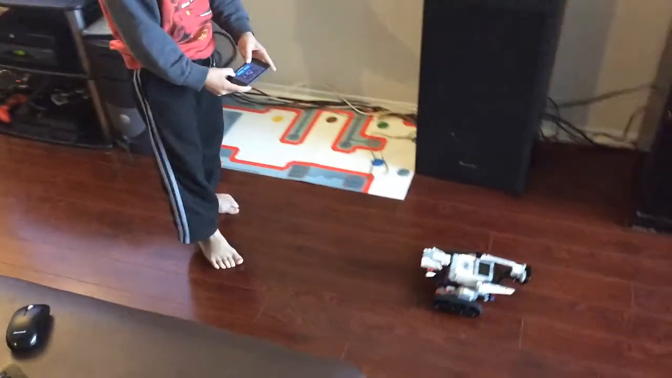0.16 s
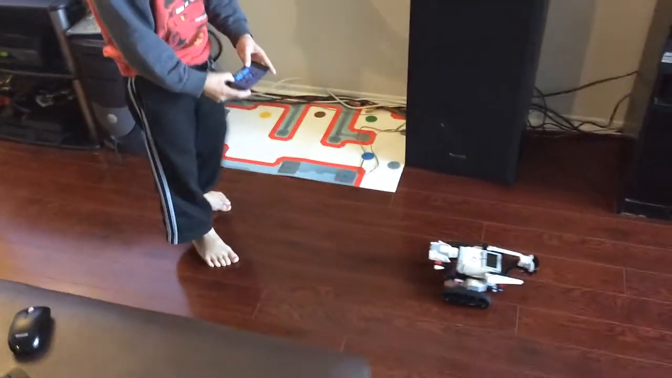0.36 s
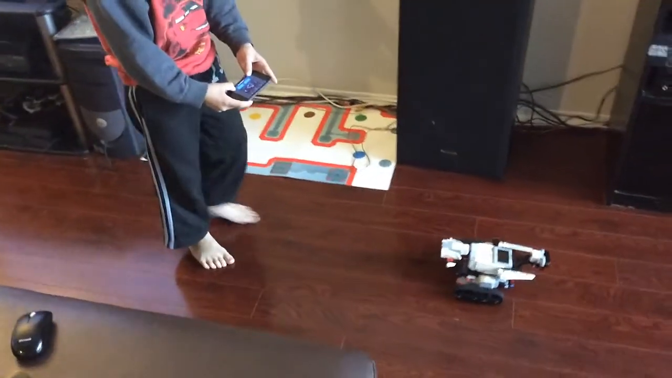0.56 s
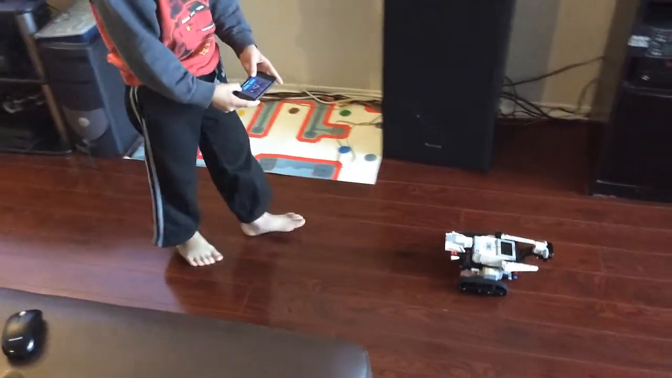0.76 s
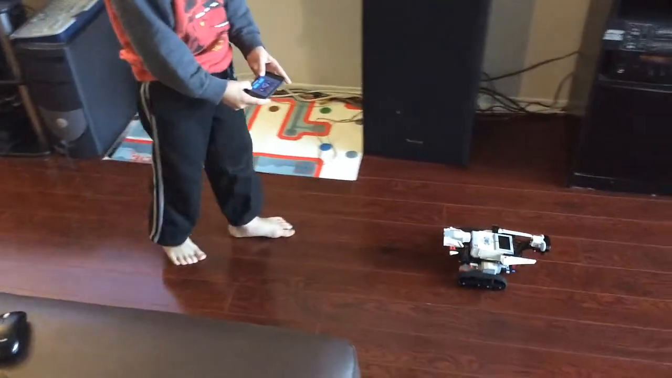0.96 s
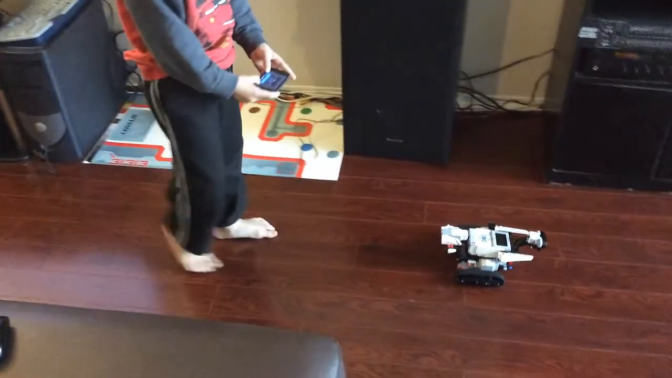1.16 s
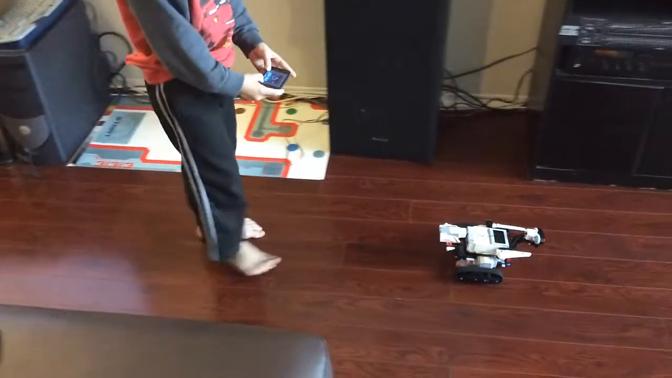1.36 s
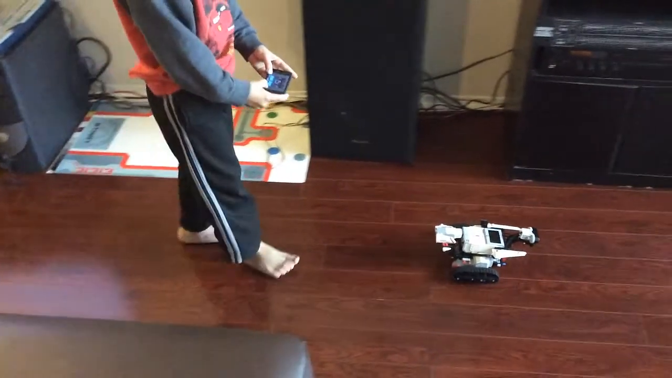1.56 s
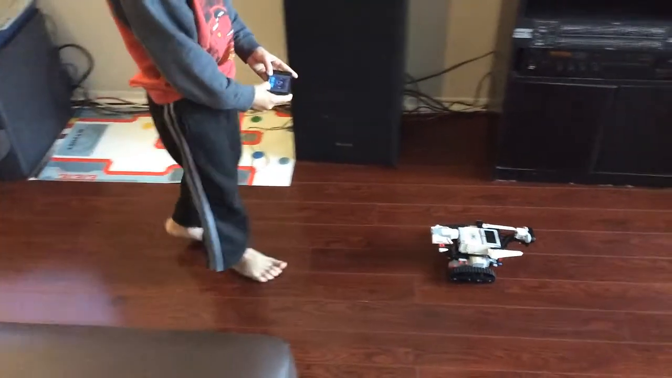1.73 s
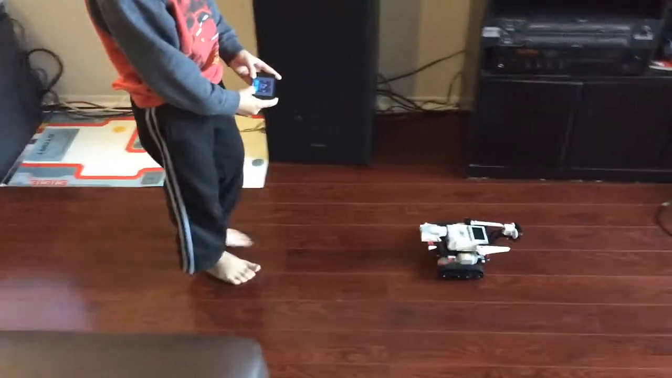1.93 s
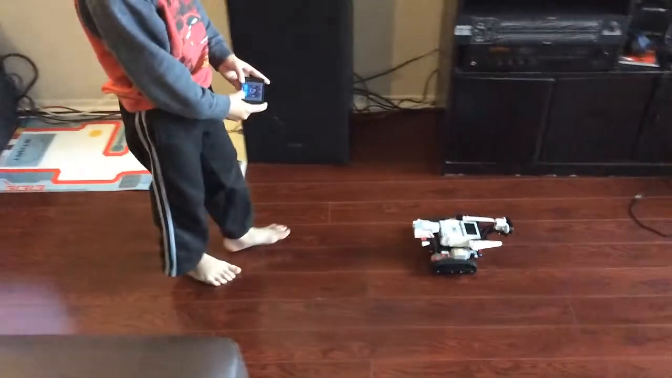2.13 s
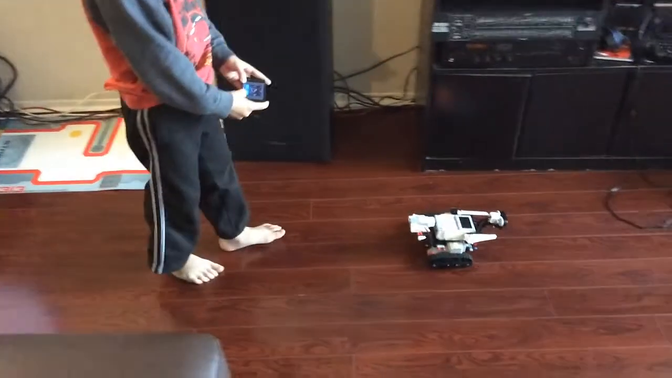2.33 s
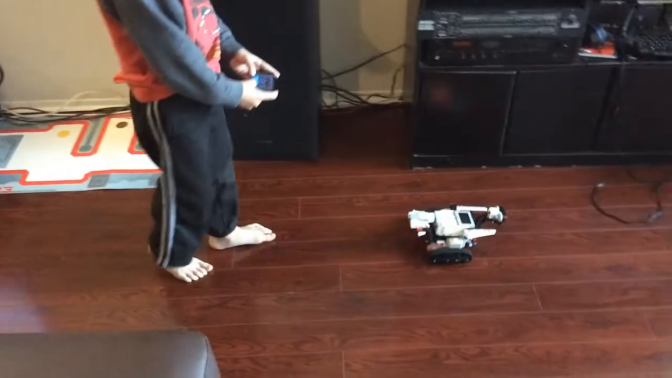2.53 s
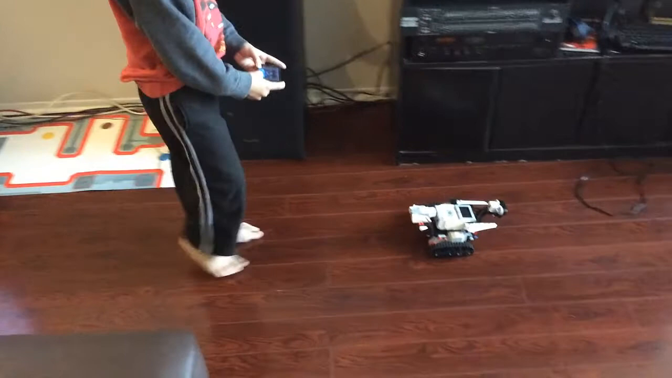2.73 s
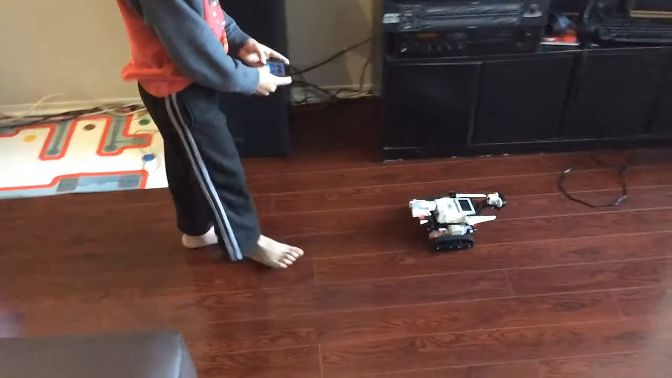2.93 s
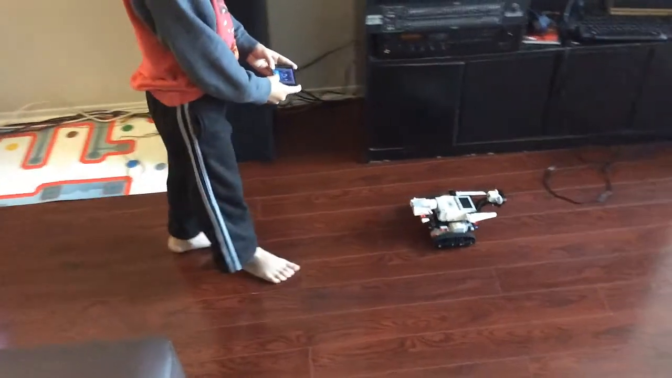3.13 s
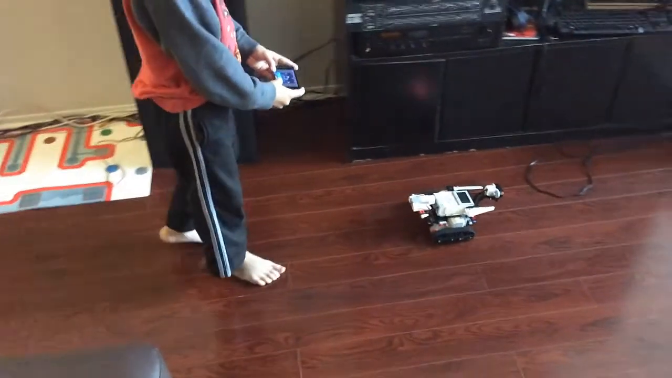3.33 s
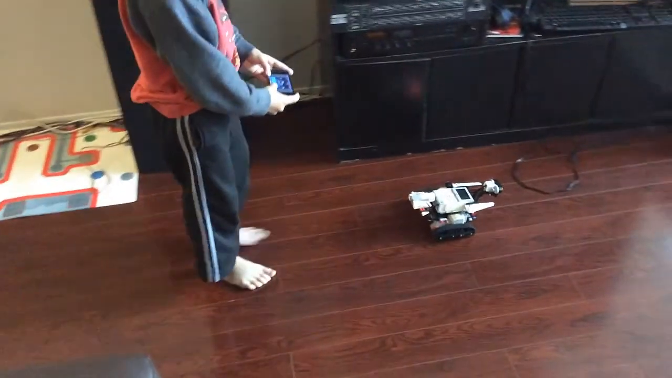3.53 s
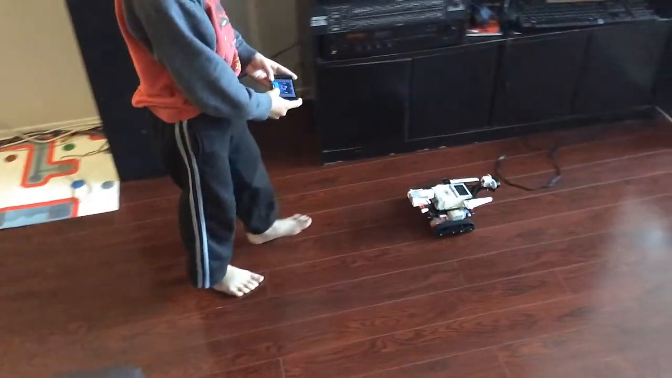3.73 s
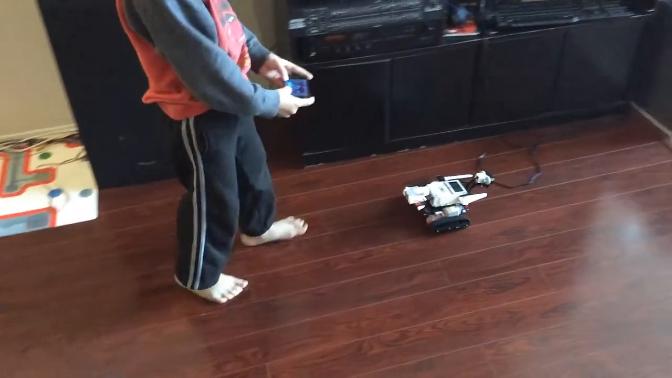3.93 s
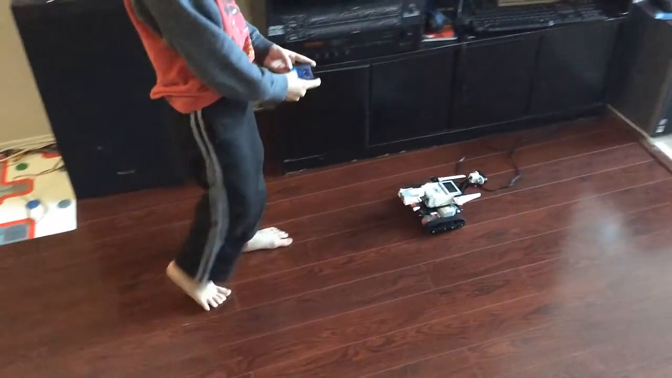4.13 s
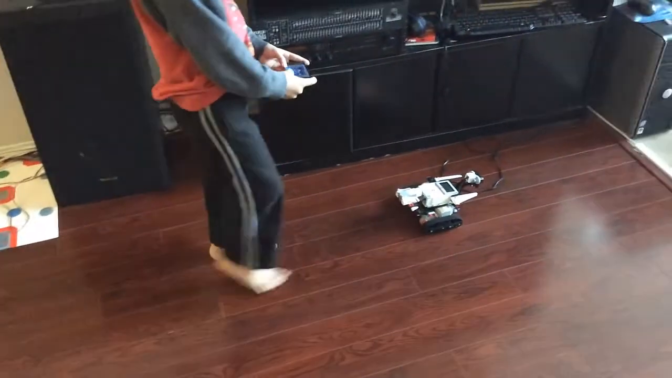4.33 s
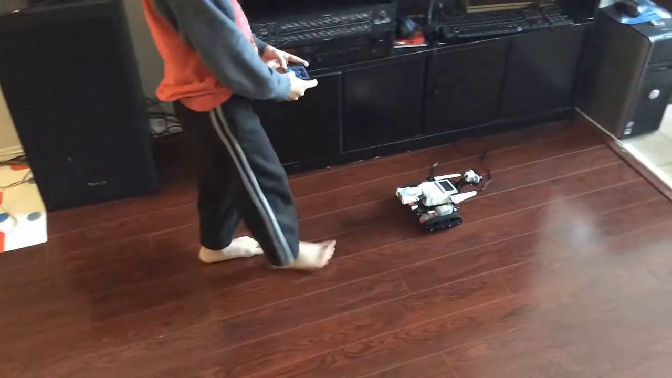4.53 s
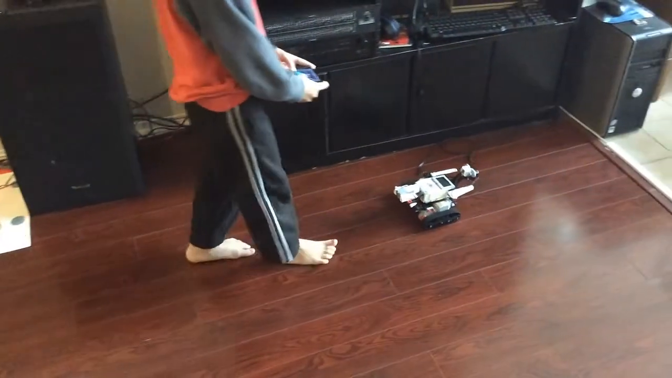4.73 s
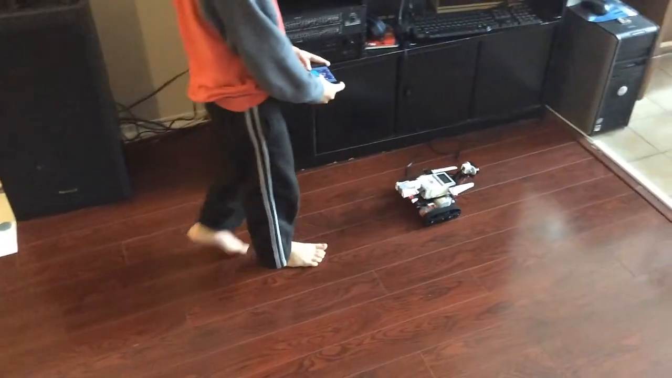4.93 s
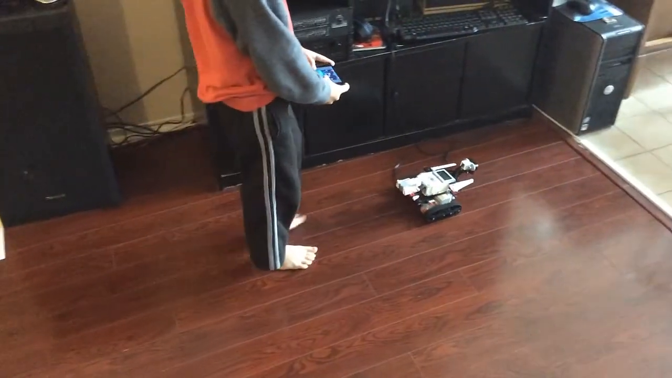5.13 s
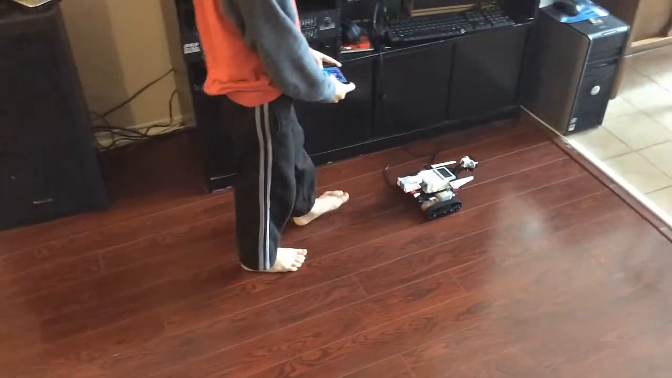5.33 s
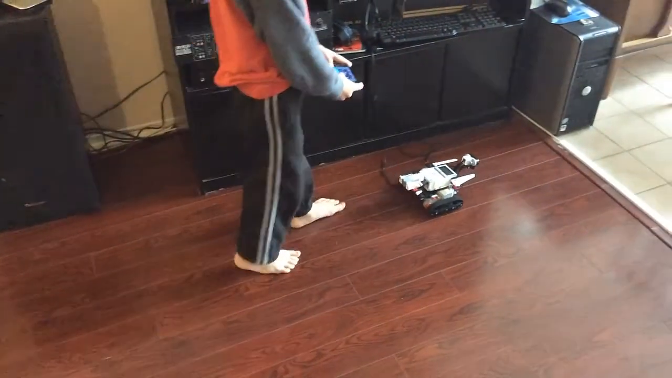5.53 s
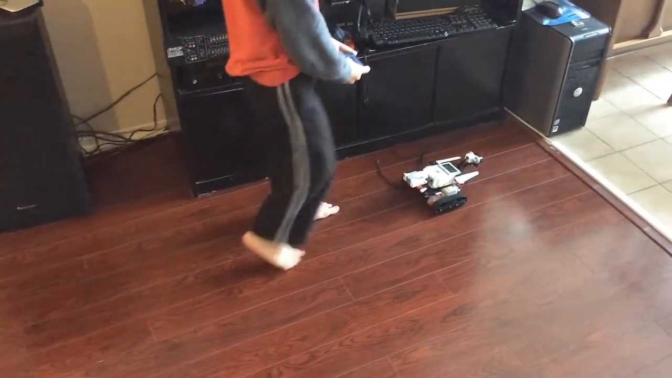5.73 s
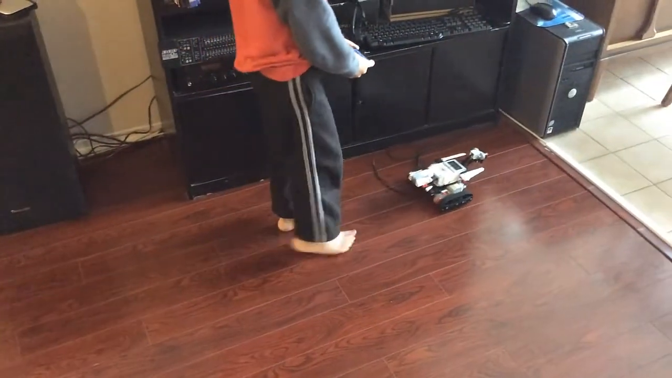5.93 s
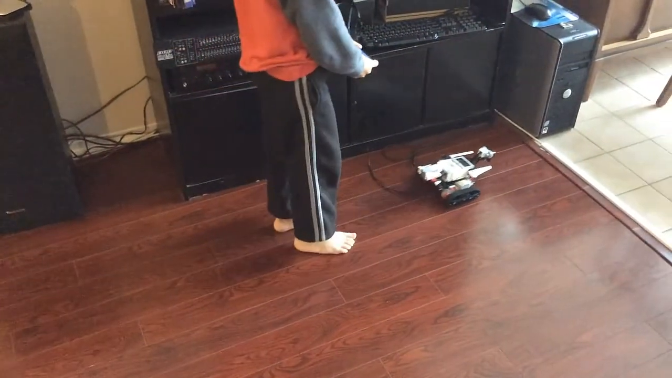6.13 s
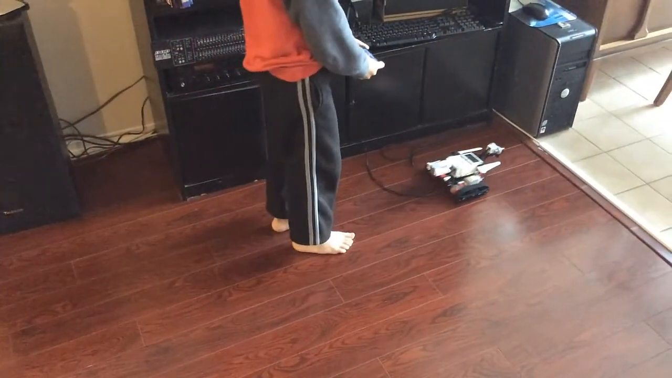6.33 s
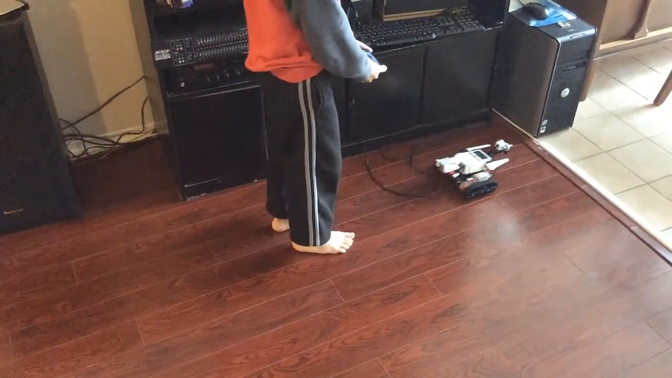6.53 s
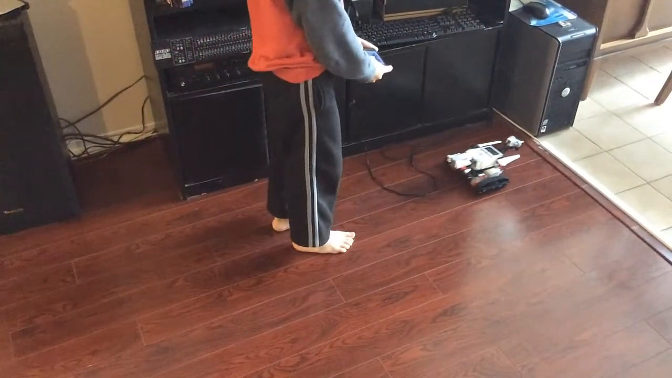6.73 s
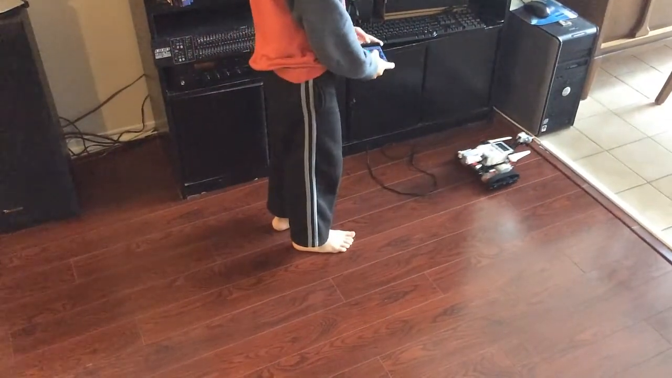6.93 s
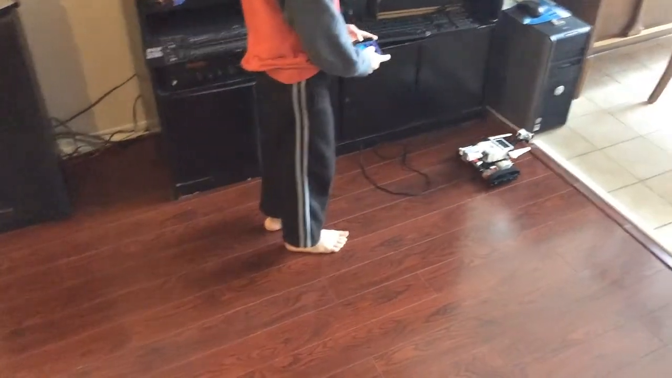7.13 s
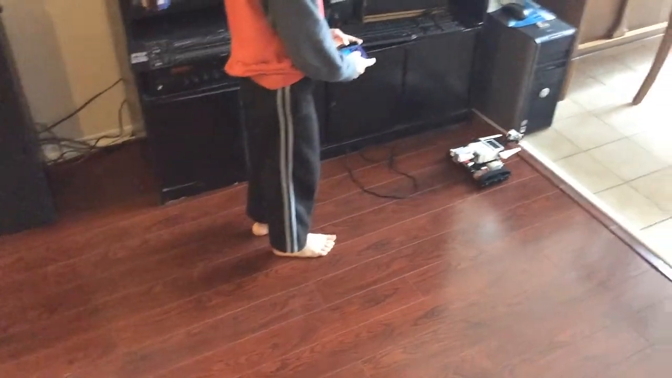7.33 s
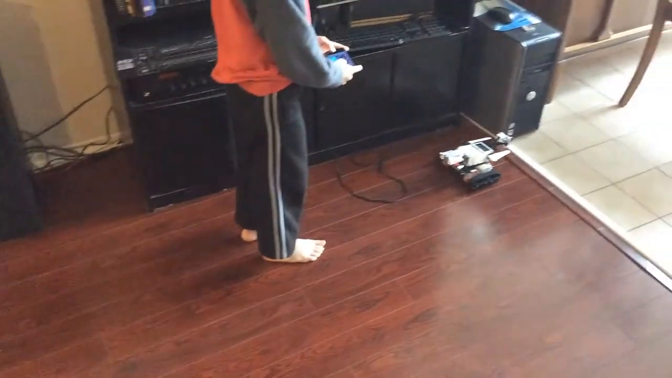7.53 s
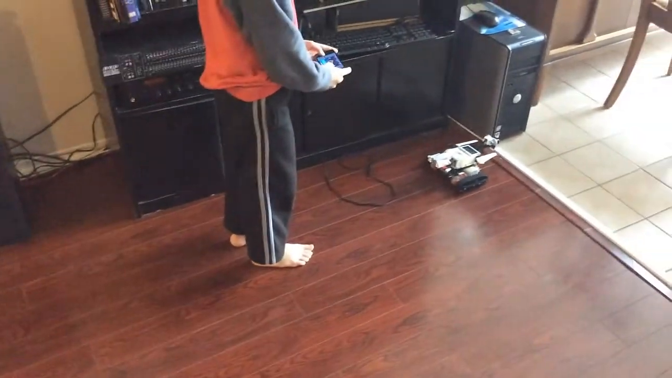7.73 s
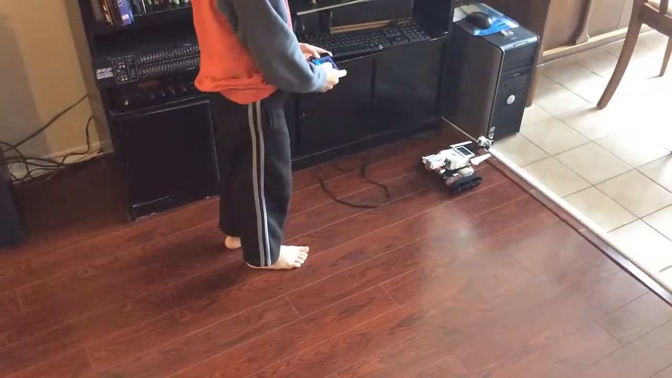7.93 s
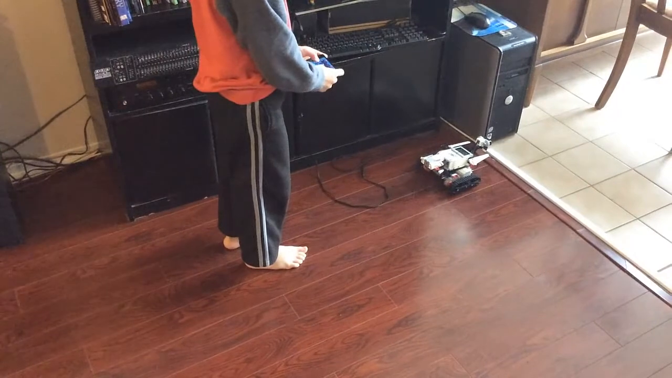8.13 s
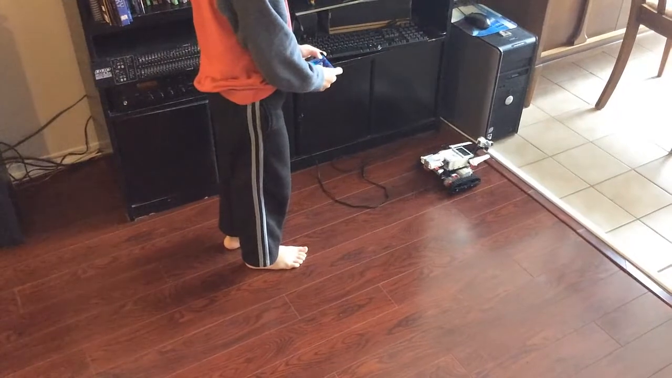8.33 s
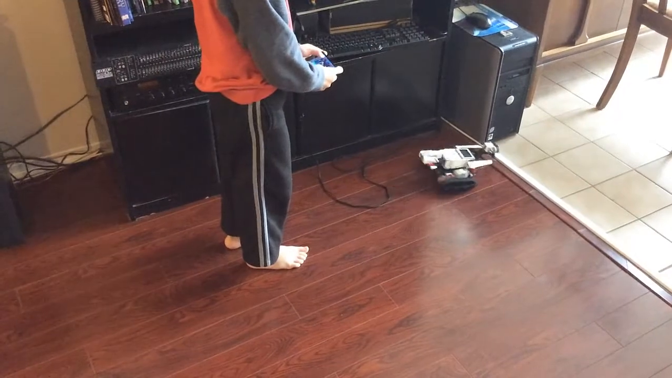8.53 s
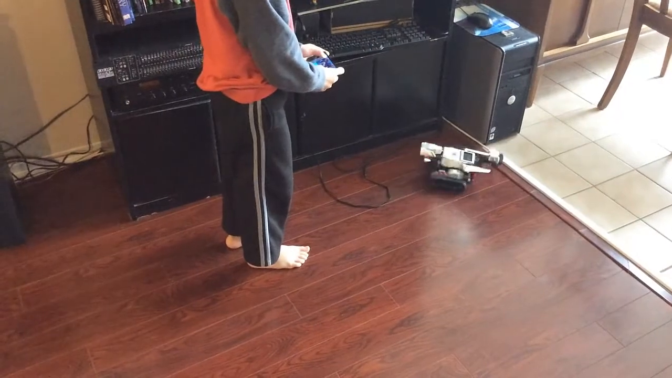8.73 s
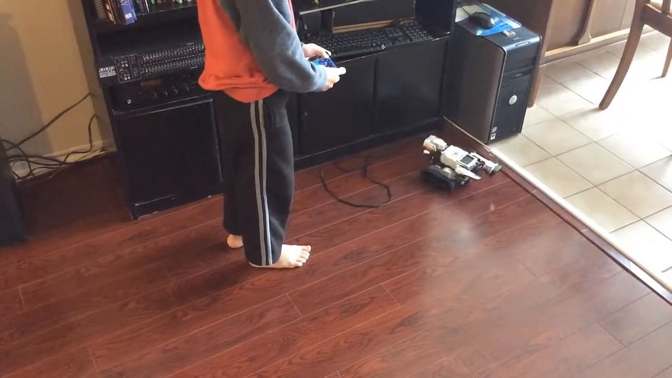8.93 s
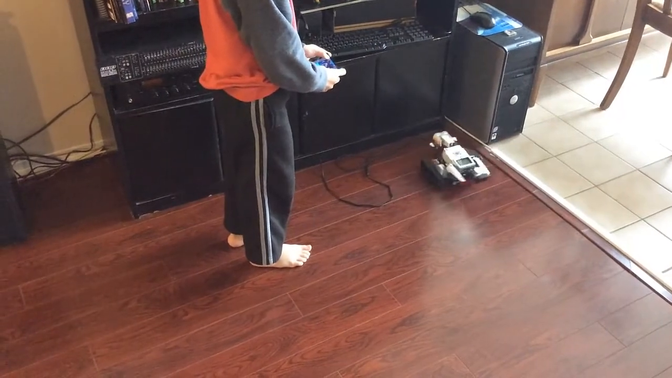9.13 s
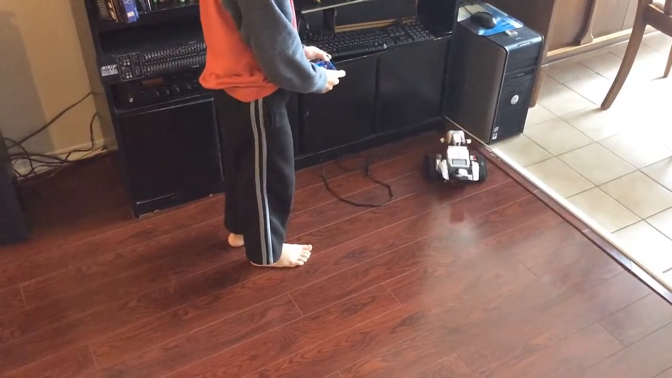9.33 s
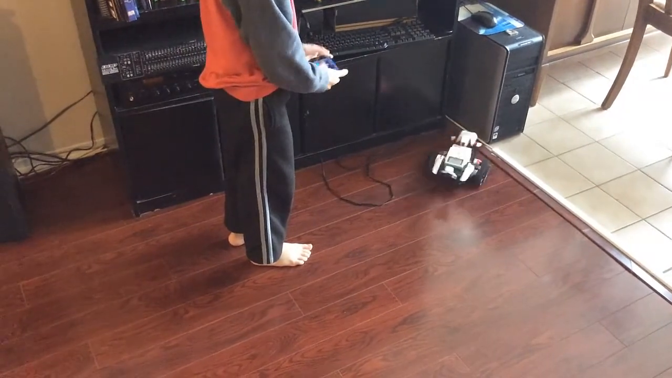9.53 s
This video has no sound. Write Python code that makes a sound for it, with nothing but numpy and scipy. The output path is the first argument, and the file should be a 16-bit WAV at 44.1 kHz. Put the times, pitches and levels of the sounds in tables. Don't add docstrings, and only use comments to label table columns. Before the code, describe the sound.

A small tracked toy robot's twin geared motors whine steadily across a hard indoor floor, coast down to a stop, then whir up again into a turn.

```python
import sys
import numpy as np
from scipy import signal
from scipy.fft import rfft, irfft, dct, next_fast_len
from scipy.io import wavfile
from scipy.ndimage import uniform_filter1d, map_coordinates

SR = 44100
rng = np.random.default_rng(int(sys.argv[2]) if len(sys.argv) > 2 else 0)


def wav_out(sig):
    wavfile.write(sys.argv[1], SR, np.round(np.clip(np.atleast_2d(sig).T, -1, 1) * 32767).astype(np.int16))


def amplitude_ratio(level_db):
    exponent = np.asarray(level_db, float) / 20
    return 10 ** exponent


N = 426447
STOP_S, START_S, TURN_S = 6.952, 8.39, 8.2
TEETH = 10
SLOW_STEP = 64


def evened(x):
    return x / np.sqrt(np.mean(abs(x) ** 2) + 1e-20)


def curves(rows):
    s, *columns = np.transpose(rows)
    return [np.interp(np.arange(N) / SR, s, c) for c in columns]


def ramp(s, length_s):
    return np.clip((np.arange(N) / SR - s) / length_s, 0, 1)


def read(points, hz):
    f, value = np.transpose(points)
    return np.interp(np.log(hz + 1), np.log(f + 1), value)


def wander(count, hz):
    shape = (count, N // SLOW_STEP + 2)
    z = rng.standard_normal(shape) + 1j * rng.standard_normal(shape)
    r = np.exp(-2 * np.pi * hz * SLOW_STEP / SR)
    return evened(signal.lfilter([1], [1, -2 * r, r * r], z))


def stretch(slow):
    return np.interp(np.arange(N) / SLOW_STEP, np.arange(len(slow)), slow)


def sway_gain(depth_db, hz):
    return amplitude_ratio(depth_db * stretch(wander(1, hz)[0].real))


def fuzzy_tone(phase, z):
    return stretch(abs(z)) * np.cos(phase + stretch(np.unwrap(np.angle(z))))


def colour(x, db_of):
    size = next_fast_len(N)
    gain = amplitude_ratio(db_of(np.fft.rfftfreq(size, 1 / SR)))
    return irfft(rfft(x, size) * gain, size)[:N]


def high_pass_db(hz, corner_hz, power):
    return -10 * np.log10(1 + (corner_hz / (hz + 1)) ** power)


def lines(rows):
    t, out = np.arange(N) / SR, 0
    for hz, width_hz, db, *steady in rows:
        share = np.clip(sum(steady), 0, 1)
        z = share + np.sqrt(1 - share ** 2) * wander(1, width_hz)[0]
        out = out + amplitude_ratio(db) * fuzzy_tone(2 * np.pi * hz * t, z)
    return out


# frequency in Hz, level in dB per Hz.
AIR_SPECTRUM = [(30, -46), (48, -13), (100, -16.5), (300, -17.5), (480, -26), (700, -32.5), (1200, -21),
                (1900, -19.5), (2700, -25.5), (4500, -24), (5500, -32), (6800, -43), (14000, -43),
                (15300, -54)]
# frequency in Hz, width in Hz, level in dB, steady share.
HUM_LINES = [(236.5, 4, -66.5, 0.9), (267, 14, -76, 0.21)]
# frequency in Hz, width in Hz, level in dB.
FAN_LINES = [(871, 48, -65), (923.4, 22.2, -52), (962, 15.7, -55.5), (1020, 74, -60.5), (1490, 60, -68.5),
             (1846, 43, -65.5), (2056, 70, -64.5), (3880, 130, -73), (4470, 100, -66), (8250, 170, -81),
             (8940, 39, -82), (12600, 74, -83), (14500, 200, -90)]
# time in seconds, gain in dB.
ROOM_GAIN = [
    (0, -2.5),
    (3, -6),
    (7.0, -4),
    (7.4, 0),
    (7.6, 1.5),
    (8.36, 1),
    (8.45, -6),
    (8.7, -8.5),
    (9.3, -10),
    (9.67, -5.5),
]


def air():
    wash_db, = curves(ROOM_GAIN)
    coasting = ramp(STOP_S - .1, 0.13) - ramp(START_S, 0.037)
    fans_db = np.maximum(-.5 + 3.8 * wash_db, -9 + 6.5 * coasting)
    hum_db = -1 + wash_db - 32 * ramp(7.85, 0.22)
    wash = amplitude_ratio(-56.5) * evened(colour(rng.standard_normal(N), lambda hz: read(AIR_SPECTRUM, hz)))
    rumble = colour(wash, lambda hz: -10 * np.log10(1 + (hz / 210) ** 8))
    noise = rumble * amplitude_ratio(0.8 * wash_db - 2) + (wash - rumble) * amplitude_ratio(wash_db)
    fans = lines(FAN_LINES) * amplitude_ratio(fans_db) * sway_gain(1.5, 3.3)
    return noise + lines(HUM_LINES) * amplitude_ratio(hum_db) + fans


# frequency in Hz, t60 in seconds.
ECHO_T60 = [(200, 0.53), (1000, 0.54), (4000, 0.64), (12000, 0.32)]


def room(x):
    taps = np.zeros(SR // 2)
    at = np.arange(200, SR // 2 - 20, 20)
    taps[at + rng.integers(0, 20, len(at))] = rng.choice([-1., 1.], len(at))
    hz, t, z = signal.stft(taps, SR, nperseg=256)
    decay = amplitude_ratio(-60 * t / read(ECHO_T60, hz)[:, None])
    tail = signal.istft(z * decay, SR, nperseg=256)[1]
    return signal.fftconvolve(x, tail / np.linalg.norm(tail))[:N]


# frequency in Hz, level in dB, t60 in seconds.
BOARD_MODES = [(188, -1, 0.065), (410, -4, 0.072), (1440, 1, 0.052)]
# start in seconds, peak in dB, thud in Hz, slap in dB.
FOOT_FALLS = [(0.881, -56, 148, -6), (1.987, -41, 373, -12.5), (1.988, -46, 165, -22),
              (2.014, -44.5, 183, -16), (2.309, -64, 241.7, -7), (4.729, -65, 308.7, -1),
              (4.969, -56, 239.7, -5.5), (5.81, -57, 441, -7), (6.07, -57.5, 234.4, -7),
              (6.389, -64, 238, -4), (7.757, -48, 586, -3.5), (7.766, -42, 1410, -23),
              (7.799, -48, 1380, -20), (7.784, -43, 538, -13), (7.802, -42, 263, -15)]


def steps():
    out, t = np.zeros(N), np.arange(6000) / SR
    boards = sum(amplitude_ratio(db - 60 * t / t60) * np.sin(2 * np.pi * hz * t) for hz, db, t60 in BOARD_MODES)
    band = signal.butter(2, [200, 1700], "band", fs=SR, output="sos")
    slaps = signal.sosfilt(band, rng.standard_normal((len(FOOT_FALLS), len(t))))
    for (s, db, hz, slap_db), slap in zip(FOOT_FALLS, slaps):
        thud = amplitude_ratio(-60 * t / 0.08) * np.sin(2 * np.pi * hz * t)
        sound = .5 * thud + 0.21 * boards + 6 * amplitude_ratio(slap_db - 60 * t / 0.16) * slap
        part = out[round(s * SR):][:len(t)]
        part += amplitude_ratio(db) * sound * np.minimum(t / 0.0013, 1)
    return out


# time in seconds, level in dB.
GEAR_EFFORT = [(0, 0), (3, 0.5), (6.87, 0.3), (7.3, -5), (7.55, -27.5), (7.57, -46), (8.3, -54), (8.38, -4),
               (8.43, 2), (8.56, 2), (9, 1.5), (9.67, -1)]
# from and to in seconds, level in dB.
SLACK_SPELLS = [
    (7.02, 7.4, -46),
    (8.415, 8.51, -41),
]
# frequency in Hz, width in Hz, level in dB.
SHELL_MODES = [(1610, 200, -16), (2370, 230, -6.5), (3270, 410, 0.5), (4240, 260, -1.5), (2820, 170, -2.5),
               (3960, 170, -15)]


def slack():
    t = np.arange(N) / SR
    rise_db_s, fall_db_s = 180, 130
    spells = 0
    for a, b, db in SLACK_SPELLS:
        spells = spells + amplitude_ratio(db - rise_db_s * np.maximum(a - t, 0) - fall_db_s * np.maximum(t - b, 0))
    ticks = rng.standard_normal(N) * (rng.random(N) < 1500 / SR)

    def ring_db(hz):
        modes = (amplitude_ratio(2 * db) / (1 + (2 * (hz - f) / width) ** 2) ** 2 for f, width, db in SHELL_MODES)
        return 10 * np.log10(sum(modes))

    return evened(colour(ticks, ring_db)) * spells * amplitude_ratio(0.68 * curves(GEAR_EFFORT)[0])


# frequency in Hz, width in Hz, peak in dB.
CASING_MODES = [(1730, 280, -0.5), (2300, 67, -1.5), (2685, 200, -2.5), (3370, 260, 4), (4130, 140, 2),
                (5704, 150, 4.5), (8340, 150, 3.5), (8680, 160, 4), (9150, 250, 2), (10000, 150, 4.5),
                (10690, 210, 4), (11730, 350, 3)]


def casing_db(hz):
    return sum(db / (1 + (2 * (hz - f) / width) ** 2) for f, width, db in CASING_MODES)


def worn(turn, repeat, renew_hz=14):
    flaws = rng.standard_normal((200, 513))
    age = np.arange(N) / SR * renew_hz
    angle = turn / TEETH / (2 * np.pi) % 1 * 512
    again = evened(map_coordinates(flaws, [age, angle], order=1))
    return repeat * again + np.sqrt(1 - repeat ** 2) * rng.standard_normal(N)


# frequency in Hz, level in dB per Hz.
RATTLE_SPECTRUM = [(700, -17.5), (1100, -20.5), (1400, -51), (1700, -10.5), (2200, -2), (2700, -1),
                   (3300, -1.5), (4000, 2), (4600, 2.5), (5500, -3), (6300, -6), (7200, -15), (9000, -21),
                   (12000, -40)]
# frequency in Hz, level in dB per Hz.
HISS_SPECTRUM = [(4120, -29.5), (7000, -14), (7490, -12), (8080, -6.5), (8640, -6.5), (10400, 1.5),
                 (11100, 1.5), (12200, 0), (15200, -17)]


def gear_noise(turn, effort_db, hiss_db, turned):
    beat = 1 + 0.23 * np.cos(turn) + 0.07 * np.cos(turn / TEETH) + 0.007 * np.cos(2 * turn / TEETH)

    def shaped(repeat, spectrum):
        db_of = lambda hz: read(spectrum, hz) + casing_db(hz) + high_pass_db(hz, 800, 8)
        return evened(colour(beat * worn(turn, repeat), db_of))

    rattle = shaped(.75, RATTLE_SPECTRUM) * amplitude_ratio(-47 + .8 * effort_db + 1.5)
    hiss = shaped(.4, HISS_SPECTRUM) * amplitude_ratio(hiss_db)
    beam_db = (1 - turned) * (-3 - 10 * ramp(STOP_S, .25)) + turned * 2
    top = colour(hiss, lambda hz: high_pass_db(hz, 13200, 24))
    hiss = hiss + (amplitude_ratio(beam_db) - 1) * top
    return sway_gain(1.37, 13.6) * rattle + sway_gain(.5, 7.7) * hiss


def whine(tooth_hz, orders, steady, fade_hz, jitter=.005):
    strain = uniform_filter1d(abs(np.gradient(np.log(tooth_hz))) * SR, 2000)
    wobble = 1 + jitter * (1 + 2.8 * strain) * stretch(wander(1, 25)[0].real)
    turn = 2 * np.pi * np.cumsum(tooth_hz * wobble) / SR
    fades = steady + np.sqrt(1 - steady ** 2) * wander(len(orders), fade_hz)
    return sum(gain * fuzzy_tone(k * turn, z) for (k, gain), z in zip(orders, fades)), turn


# multiple of the tooth rate, level in dB against the hiss.
MESH_ORDERS = [(5, -7.5), (6, -12.5), (7, -18.5), (8, -12.5), (9, -13), (10, -34), (11, -20)]
# multiple of the shaft rate, level in dB against the hiss.
SHAFT_ORDERS = [(16, -19.5), (17, -22), (19, -17.5), (21, -15), (22, -33), (23, -22.5), (24, -23.5),
                (26, -29.5), (31, -9.5), (34, -24), (36, -32), (38, -22), (44, -18)]


def minor_orders(tooth_hz, hiss_db, turned):
    near_db = (1 - turned) * (3 - 1.3 * np.arange(N) / SR) + turned * 0.5
    mesh = [(k, amplitude_ratio(db)) for k, db in MESH_ORDERS]
    shaft = [(k, amplitude_ratio(db + (k < 2 * TEETH) * near_db)) for k, db in SHAFT_ORDERS]
    upper, _ = whine(tooth_hz, mesh, steady=.2, fade_hz=30, jitter=.008)
    lowest, _ = whine(tooth_hz, [(1, amplitude_ratio(-22 + near_db))], steady=.6, fade_hz=6)
    between, _ = whine(tooth_hz / TEETH, shaft, steady=.39, fade_hz=20)
    level = amplitude_ratio(hiss_db - 0.5) * (tooth_hz / 1000) ** 2
    return colour((lowest + upper + between) * level, casing_db)


# time in seconds, tooth order, gain in dB.
ROOM_SPOTS = [(.7, 2, 4.5), (1.7, 2, -5), (2.25, 2, 0.5), (2.9, 2, 2.5), (4.15, 2, -10.5), (5.55, 2, -1.5),
              (3.7, 2, -4), (6.35, 2, 1.5), (6.8, 2, -4), (8.95, 2, 6.5), (1.6, 3, 3.5), (2.5, 3, -4),
              (2.9, 3, 1), (3.55, 3, 6.5), (4.4, 3, -4), (5.6, 3, -9), (5.1, 3, -1), (6.5, 3, 2.5),
              (9.2, 3, -2.5), (.2, 3, -1), (.6, 4, 0.5), (9.1, 4, -1), (2, 4, 5), (3.5, 4, -8),
              (4.35, 4, 5), (5.2, 4, 3.5), (5.75, 4, 3.5), (6.8, 4, -3), (8.75, 4, 5.5)]


def spots_db(order, half_width_s=0.14):
    t = np.arange(N // SLOW_STEP + 2) * SLOW_STEP / SR
    bumps = (db * np.exp(-((t - s) / half_width_s) ** 2) for s, k, db in ROOM_SPOTS if round(k) == order)
    return stretch(sum(bumps))


FIRST_ORDERS_DB = [-44.5, -44, -47]
SECOND_ORDERS_DB = [-6.5, 0, -1.5]
COAST_FADE_DB_S = [5, 35.7, 38]


def strong_orders(tooth_hz, partner_hz, effort_db, turned):
    far_s, off_s = np.minimum(np.arange(N) / SR, STOP_S), ramp(STOP_S, 1)
    far_fade_db_s, surge_db = [.5, 0.16, 0], [2, 5, 7.5]
    main = []
    for k, db, fade, far in zip([2, 3, 4], FIRST_ORDERS_DB, COAST_FADE_DB_S, far_fade_db_s):
        loss_db = far * far_s + fade * off_s * (1 - turned)
        main.append((k, amplitude_ratio(db + spots_db(k) + 1.1 * effort_db - loss_db)))
    first, turn = whine(tooth_hz, main, steady=.6, fade_hz=17, jitter=.0055)
    surge = ramp(START_S, .03) - ramp(START_S + .14, 0.13)
    strained = [(k, g * amplitude_ratio(db + surge * more)) for (k, g), db, more in zip(main, SECOND_ORDERS_DB, surge_db)]
    strained.append((5, surge * amplitude_ratio(-43)))
    second, _ = whine(partner_hz, strained, steady=.45, fade_hz=18, jitter=.006)
    late = turned - ramp(START_S + 0.029, 0.081)
    both = first * amplitude_ratio(-12 * late) + second * amplitude_ratio(-2)
    return colour(both, lambda hz: high_pass_db(hz, 1450, 14)), turn


def speed(powered_hz, loss_hz_s, start_hz, gain_hz_s):
    t = np.arange(N) / SR
    free_hz = np.maximum(powered_hz - loss_hz_s * (t - STOP_S), start_hz + gain_hz_s * (t - START_S))
    return uniform_filter1d(np.clip(free_hz, 300, powered_hz), size=3000)


# time in seconds, tooth rate in Hz, second motor faster in percent.
DRIVE_SPEED = [(0, 1013, 1.5), (1.2, 1010, -0.58), (2.8, 1008, 0.67), (4, 1002, 0.27), (4.93, 998.5, -.5),
               (5.02, 1017, 0.9), (6, 1011, -1.5), (6.5, 1020, -1.5), (7, 1012, 1), (8.55, 915.3, 1),
               (8.7, 968.4, 1.5), (8.95, 970, 3), (9.3, 967, .8), (9.67, 964.5, 2)]
# coasting loss in Hz/s, tooth rate at the start in Hz, spin-up in Hz/s.
MOTOR_SPINS = [
    (1700, 550, 2000),
    (1400, 765, 1150),
]


def motors():
    mean_hz, faster_percent = curves(DRIVE_SPEED)
    wheel = 2 * np.pi * (np.arange(N) / SR - .03) / .72
    swing_hz = 5 * np.cos(wheel) + 7 * np.cos(2 * wheel)
    powered_hz = mean_hz + (1 - ramp(STOP_S, .1)) * swing_hz
    tooth_hz = speed(powered_hz, *MOTOR_SPINS[0])
    partner_hz = speed(powered_hz * (1 + faster_percent / 100), *MOTOR_SPINS[1])
    effort_db, turned = curves(GEAR_EFFORT)[0], ramp(TURN_S, .1)
    hiss_db = -44 + effort_db
    strong, turn = strong_orders(tooth_hz, partner_hz, effort_db, turned)
    minor = minor_orders(tooth_hz, hiss_db, turned)
    return strong + minor + gear_noise(turn, effort_db, hiss_db, turned)


def scene():
    near = motors() + slack() + steps()
    mono = near + amplitude_ratio(-6.5) * room(near) + air()
    return np.array([mono, mono])


# frequency in Hz, step in dB.
COARSE_STEP = [(1000, -26), (2200, -12), (5000, -3), (6200, 4), (7500, 5), (8500, 1), (12000, 1),
               (13300, 8), (14500, 12), (15100, 12), (15300, 8)]


def patchy_treble(x, size=1024):
    half, blocks = size // 2, N // size + 3
    padded = np.pad(x, (size, blocks * size - N - size)).reshape(blocks, size)
    window = np.sin(np.pi * (np.arange(2 * size) + .5) / (2 * size))
    a, b, c, d = np.split(np.hstack([padded[:-1], padded[1:]]) * window, 4, axis=1)
    bins = dct(np.hstack([-c[:, ::-1] - d, a - b[:, ::-1]]), type=4, norm="ortho")
    power = uniform_filter1d(uniform_filter1d(bins ** 2, size=48, axis=1), size=3, axis=0)
    chance_db = 2 * np.repeat(rng.standard_normal((len(bins), size // 32)), 32, axis=1)
    step_db = read(COARSE_STEP, np.arange(size) * SR / 2 / size) + chance_db
    step = np.sqrt(power + 1e-16) * amplitude_ratio(step_db)
    u = dct(np.round(bins / step) * step, type=4, norm="ortho")
    p, q = u[:, :half], u[:, half:]
    frames = np.hstack([q, -q[:, ::-1], -p[:, ::-1], -p]) * window
    return (frames[:-1, size:] + frames[1:, :size]).ravel()[:N]


def low_pass(x):
    return signal.sosfilt(signal.butter(12, 15360, fs=SR, output="sos"), x)


def record(dry):
    mono = patchy_treble(dry[0])
    return low_pass(np.array([mono, mono]))


dry = scene()
out = record(dry)
wav_out(out)
```